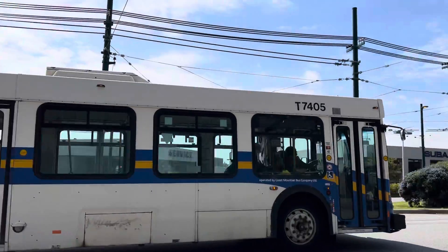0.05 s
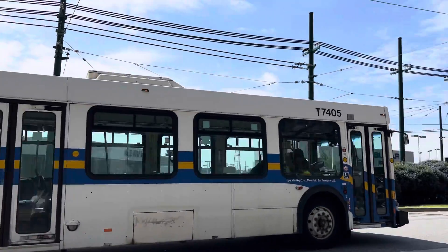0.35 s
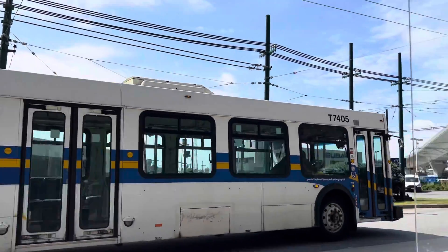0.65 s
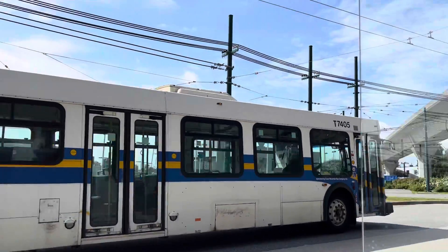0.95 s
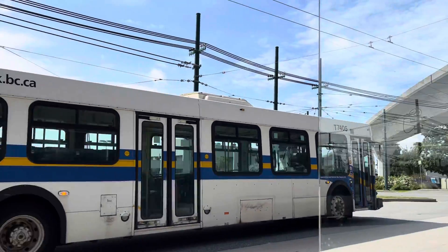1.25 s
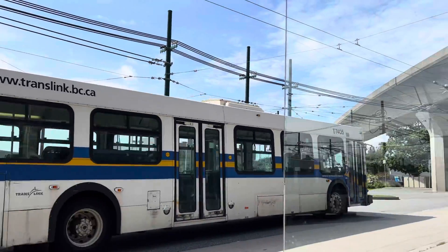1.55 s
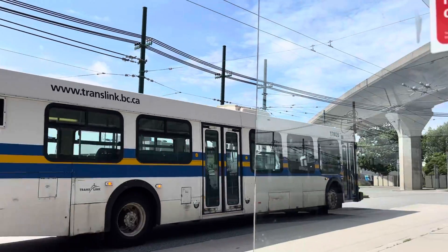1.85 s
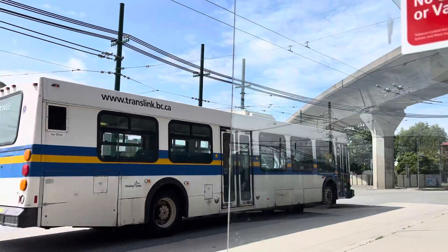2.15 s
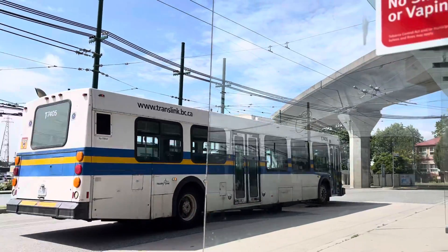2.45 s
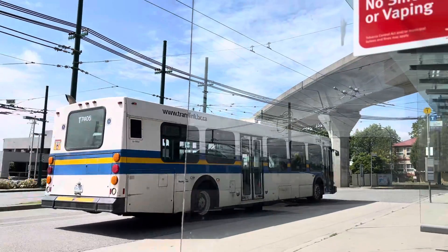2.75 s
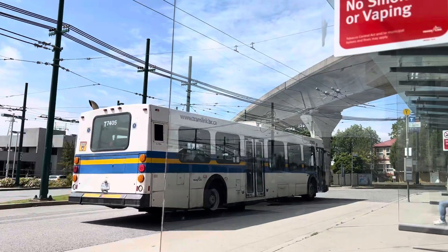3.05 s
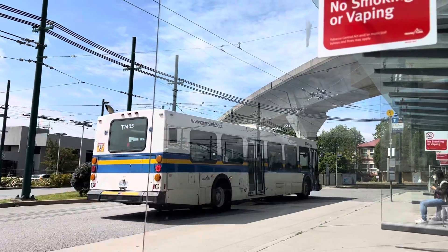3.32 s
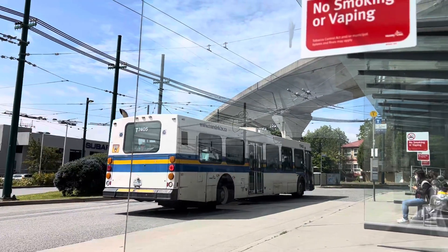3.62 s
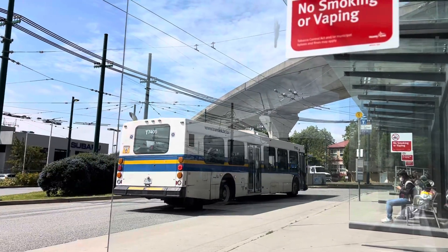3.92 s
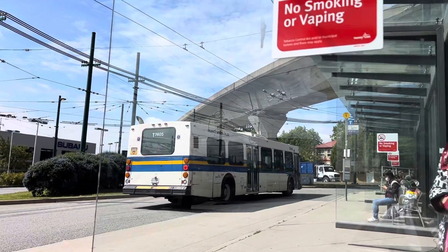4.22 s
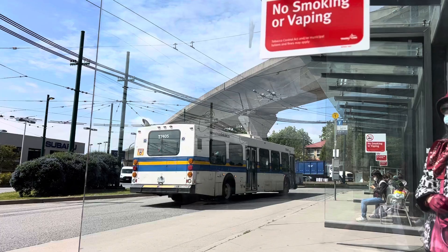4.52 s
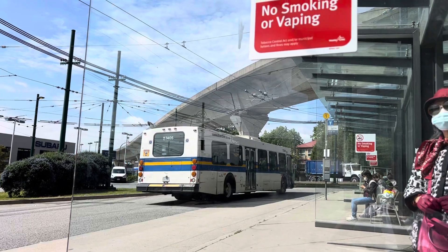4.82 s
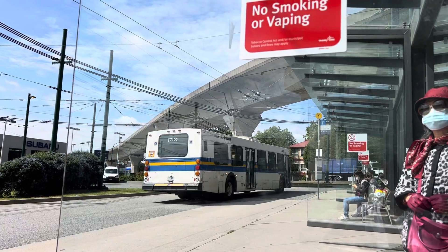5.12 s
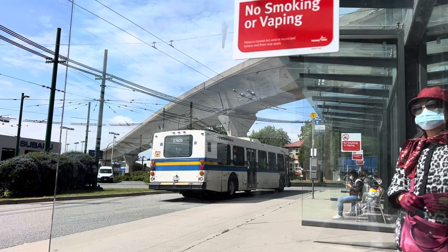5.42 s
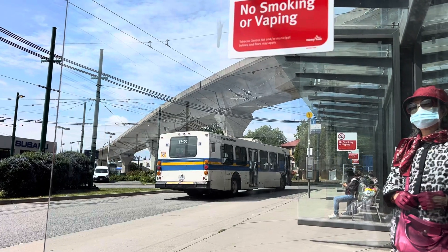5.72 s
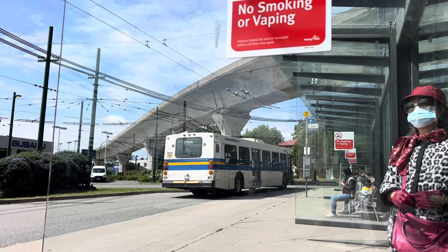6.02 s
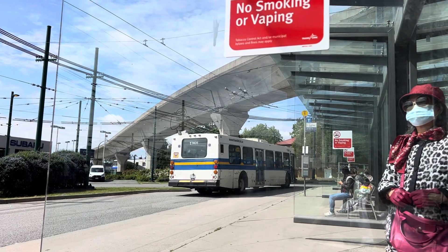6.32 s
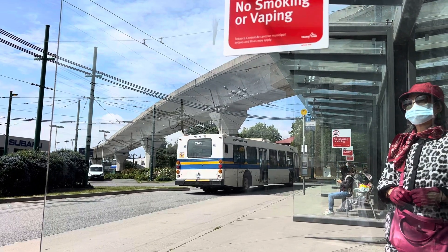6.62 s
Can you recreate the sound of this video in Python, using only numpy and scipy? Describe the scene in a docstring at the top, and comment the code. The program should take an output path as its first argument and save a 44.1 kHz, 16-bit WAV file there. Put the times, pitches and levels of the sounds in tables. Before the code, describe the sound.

A diesel bus throbs past close by with rattles and two sharp air pops, then pulls away and lets out a short hiss.

```python
"""A diesel bus rolls past a roadside stop at low revs, over street rumble. Its exhaust throbs,
injectors clatter, gears sing, the fan roars and the turbo spins down. From 0.4 s a loose cover
rattles; air valves pop and hiss near 0.6 s and 1.5 s. The bus pulls away, with a thin whine from 4 s.
Other traffic nears, and at 6 s the bus blows a short hiss of air, echoed by shelter and viaduct."""
import sys
import numpy as np
from scipy import signal
from scipy.fft import irfft, next_fast_len
from scipy.io import wavfile

SR = 44100
rng = np.random.default_rng(int(sys.argv[2]) if len(sys.argv) > 2 else 0)


def persist_wave(psi):
    """Save psi, clipped to +-1, as 16-bit WAV."""
    counts = np.round(np.clip(psi, -1, 1) * 32767).astype(np.int16)
    wavfile.write(sys.argv[1], SR, np.atleast_2d(counts).T)


N = 298106
TIME = np.arange(N) / SR
FFT_SIZE = next_fast_len(N, real=True)
HZ = np.maximum(np.fft.rfftfreq(FFT_SIZE, 1 / SR), 1)

# stereo width of the noise: f/Hz, left-right correlation; a narrow band at 9-11 kHz is in opposite phase
STEREO_CORRELATION = [(70, .99), (150, 0.4), (350, 0.75), (700, 0), (2000, 0.08), (6000, 0.1), (7500, .9),
                      (8500, .7), (9100, -.9995), (10900, -.9995), (11600, .93)]
STEREO_BALANCE = [(80, 0.5), (350, 2), (900, 1), (2400, 5.5), (4500, 9), (8500, 1), (15000, -2.5)]  # balance of the noise: f/Hz, left-right/dB

FIRING_RATE = [(0, 47.2), (.21, 46.2), (.38, 41.6), (.53, 39.5), (.63, 40.9), (.76, 41.9), (1.0, 46.6),
               (1.17, 47), (1.3, 44.8), (1.4, 38.9), (1.49, 38.9), (1.72, 40.9), (2.31, 39.2), (2.39, 36.4),
               (2.55, 36.9), (3.75, 36.5), (4.15, 39.0), (4.6, 39.1), (5.3, 37.7), (6.76, 35.7)]  # engine speed: t/s, f/Hz
# throttle between gear changes: start/s, end/s, release/s, sag/(dB/s), base level/dB of orders 1-4
PULLS = [(-.05, .21, 0.19, 8, -14.5, -28.5, -23.5, -51), (0.45, 1.2, 0.17, 2.8, -16, -22, -28.5, -42.5),
         (1.385, 2.266, 0.1, 2.5, -19.5, -20.5, -26, -49), (2.334, 4.06, 1, -0.5, -23.5, -21.5, -24, -46),
         (4.534, 6.8, .2, -0.5, -27, -19.5, -24.5, -40)]
OVERRUN_DB = [-34, -38, -30.5, -40.5]  # throttle shut: base level/dB of orders 1-4
GEAR_SHIFTS = [(0.39, 0.055, -9), (1.35, 0.027, -9), (2.345, 0.025, 1)]  # exhaust catches: t/s, half-length/s, gain/dB
THROB = [(.6, -1), (.85, 1.5), (1.38, 1), (1.47, -3), (1.57, 2.5), (1.75, -2), (2.0, -1), (2.4, -2.5),
         (2.6, -2), (3.5, 1), (4.2, 2), (5.0, -3), (5.6, 2), (6.1, -2), (6.6, -9)]  # order 1 wavers: t/s, gain/dB
DRONE = [(.6, 0), (.96, -0.5), (1.04, -5), (1.14, 2.5), (2.3, 1.5), (2.65, -0.5), (3.05, 2), (3.5, -2),
         (3.7, 4), (4.0, -2.5), (4.15, 1.5), (4.38, -6.5), (4.8, 4), (5.1, 1.5), (5.33, -5.5), (5.47, 1),
         (6.3, 0.5), (6.6, 4)]  # order 2 wavers: t/s, gain/dB
PUFF_BLUR = [(1.0, 0.35), (1.7, 0.55), (2.6, 0.7)]  # puffs merge to a drone behind the bus: t/s, blur (0-1)
CRANK_TONES = [(7, -18), (8, -20), (10, -16.5), (13, -24), (15, -19.5), (16, -22), (18, -23), (20, -22.5),
               (21, -23), (23, -23.5), (24, -26.5), (27, -20.5), (33, -20), (37, -25.5)]  # unequal cylinders: multiple of crank rate, relative level/dB

BLOCK_MODES = [(1024, 4, 0.26), (1092, 5.5, 0.048), (1174.5, 4, 0.12), (1591, 2.5, 0.05), (1675, -3, 0.04),
               (2423, 2, 0.05), (2538, -0.5, 0.043), (3240, -4.5, 0.022), (3508, -2, 0.03),
               (3630, -5, 0.039), (4130, -3.5, 0.028)]  # block and covers: f/Hz, relative level/dB, t60/s
GRILLE = [(0, -10), (.7, -7.5), (1.1, -10), (1.5, -8), (2, -4.5), (3.2, -5.5), (4, -14.5), (6.76, -30)]  # knock let out as the grille turns: t/s, gain/dB
GEAR_TONES = [(14, -5.5), (23, -12)]  # timing gears: multiple of firing rate, level/dB re order 4

# roar, clatter, hiss: lead on exhaust/m, near level/dB, rev slope/(dB/oct), distance power, floor/dB
BAY_LAYERS = [(3, -25, 2.5, 1.62, -35), (1.5, -29, 1.5, 1.61, -43), (-0.4, -37.5, 6, 2.35, -55)]
BAY_SPECTRUM = [(90, 10), (150, -0.5), (195, 1.5), (240, -5.5), (340, -2.5), (560, -6.5), (950, -6.5),
                (1330, -12.5), (2300, -15), (4300, -24.5), (6300, -34.5), (7400, -39), (10500, -46.5),
                (15500, -54.5)]  # engine bay: f/Hz, relative density/dB
BAY_RESONANCES = [(291, 30, 2.5), (348, 22, 3), (453, 35, 2), (1125, 96, 2.5), (1496, 80, 3.5),
                  (2490, 60, 0), (3230, 76, 0), (6470, 180, 7)]  # cavity: f/Hz, width/Hz, gain/dB
BAY_BEARING = [(0, 0.39, 0.5), (1.3, 0.37, -4), (2, 0.15, 1), (3.1, 0.18, 1.5), (3.8, 0.11, -2),
               (6.76, 0.054, -3)]  # direction: t/s, right-ear lag/ms, left-right/dB before band weighting
TURBO = [(0, 4220, -59), (.17, 4030, -57), (.265, 3920, -53), (.3, 3865, -62), (.338, 3820, -44),
         (.368, 3780, -56), (.397, 3750, -44.5), (.435, 3690, -62), (.47, 3645, -55), (.55, 3585, -57),
         (.67, 3515, -58), (.8, 3420, -61), (1.2, 3250, -65), (2.15, 2920, -62), (2.33, 2820, -54),
         (2.55, 2720, -58), (2.85, 2640, -60), (3.1, 2600, -79)]  # whistle: t/s, f/Hz, level/dB
STREET_SPECTRUM = [(18, -26), (30, 0), (45, 11.5), (75, 12.5), (110, -3), (160, -21), (350, -8),
                   (1000, -15.5), (4000, -74)]  # rumble: f/Hz, relative density/dB

RATTLES = [(0.41, -25, -20), (0.947, -32, 0), (1.10, -29, -2), (1.222, -33, -4), (1.366, -33, -8),
           (1.668, -30, -1), (1.812, -40, 14.5), (1.948, -40.5, 11.5), (1.992, -31, -5), (2.222, -33, 0),
           (2.397, -33, 3), (2.508, -29, -1), (2.588, -31, 1), (2.75, -37, 4), (2.815, -36, 0),
           (2.928, -37, 7), (3.086, -32, -4), (3.164, -40, 0), (3.243, -45, 10.5), (3.28, -36, -2),
           (3.41, -33.5, -8), (3.486, -33, -9)]  # cover knocks: t/s, level/dB, tilt/(dB/oct)
COVER_MODES = [(1014, -3, 0.095), (1056, -8.5, 0.079), (1180, -9, 0.075), (1596, -5.5, .06),
               (2450, -12, 0.06), (2586, -10, 0.059), (3544, -18.5, .04)]  # loose cover: f/Hz, gain/dB, t60/s

# air valves: t/s, snap/dB, crack/dB, crack delay/s, hold/s, fall/s,
# thud/dB, thud f/Hz, thud rise/s, thump/dB, squeak/dB
POPS = [(0.5712, -23, -21.5, 0.0025, 0.0065, 0.014, -14, 451, 0.0064, -15.5, -29.5),
        (1.552, -21.5, -20.5, 0.0024, 0.0026, 0.015, -16, 464, 0.006, -12.5, -39)]
CRACK_SPECTRUM = [(150, 9), (320, 16.5), (600, -1), (1150, 9), (1500, -4), (2800, -0.5), (3600, -5),
                  (6000, -12.5), (8500, -9), (12000, -14), (15500, -19)]  # air blast: f/Hz, relative density/dB
VALVE_MODES = [(303, -9, 0.0042), (373, -17, 0.0045), (746, -16, 0.0047), (1140, -29, .007),
               (2190, -25.5, 0.021), (2702, -16.5, 0.0057)]  # valve body: f/Hz, level/dB re thud, rise/s
BRACKET_MODES = [(215, -9, 0.0031), (333, -2.5, 0.0012)]  # shaken by the piston: f/Hz, level/dB re thump, rise/s
SEAT_MODES = [(5650, -1.5), (5780, -4), (6100, -3), (7000, -19)]  # valve seat: f/Hz, level/dB re squeak
JETS = [(0.656, -31, .002, 0.023, 0.021, 9100, -18), (0.658, -30.5, 0.011, 0.013, 0.017, 5000, 33),
        (0.805, -50.5, 0.055, 0.11, 0.036, 10500, 0), (1.46, -43, .003, .006, .01, 5000, 11),
        (3.855, -56, .13, .08, 0.18, 6200, 10.5), (6.057, -28, 0.041, 0.023, 0.11, 2500, 7)]  # air releases: t/s, level/dB, rise/s, hold/s, fall/s, low edge/Hz, nozzle peak/dB
AIR_SPECTRUM = [(700, 12), (2700, 13.5), (4400, 12.5), (6000, 4.5), (8300, 10.5), (10500, 14), (11400, 3),
                (12200, 5.5), (15300, 2)]  # escaping air: f/Hz, relative density/dB

WHINE = [(4.0, 3500, -80), (4.25, 3500, -67), (4.55, 3485, -62), (5.0, 3470, -62), (5.3, 3440, -64.5),
         (5.7, 3430, -66.5), (6.76, 3410, -74)]  # receding bus: t/s, f/Hz, level/dB
TRAFFIC_LEVEL = [(4.5, -45), (5.6, -42), (6.05, -35.5), (6.76, -41.5)]  # across the road: t/s, level/dB
TRAFFIC_SPECTRUM = [(25, -45), (70, -11), (160, 3), (240, -0.5), (350, 1), (600, -9.5), (1400, -10.5),
                    (4000, -39), (10000, -63.5)]  # its noise: f/Hz, relative density/dB
TRAFFIC_HUM = [(146.6, 13, 13), (200, 16, 5.5), (351, 25, 7)]  # its engines: f/Hz, width/Hz, gain/dB


def from_db(db):
    """Decibels to gain."""
    return np.exp(np.asarray(db) * (np.log(10) / 20))


def unit_rms(x):
    """Scale to unit power."""
    return x / np.sqrt(np.mean(x ** 2) + 1e-20)


def over_time(rows):
    """Each column after t/s, interpolated per sample."""
    times_s, *columns = np.transpose(rows)
    return [np.interp(TIME, times_s, column) for column in columns]


def over_hz(rows):
    """Table interpolated over log frequency."""
    hz, value = np.transpose(rows)
    return np.interp(np.log(HZ), np.log(hz), value)


def bell(centre_hz, width_hz, hz=HZ):
    """Resonance curve of height 1."""
    return 1 / (1 + (2 * (hz - centre_hz) / width_hz) ** 2)


def above(edge_hz, order):
    """High-pass power response."""
    return 1 / (1 + (edge_hz / HZ) ** (2 * order))


def drift(rate_hz):
    """Slow random curve, unit RMS."""
    steps = rng.standard_normal(4096)
    return unit_rms(np.interp(TIME * rate_hz, np.arange(len(steps)), steps))


def pan(left_db):
    """Left and right gains, unit mean power."""
    gains = from_db(np.array([left_db / 2, -left_db / 2]).reshape(2, -1))
    return gains / np.sqrt(np.mean(gains ** 2, axis=0))


def white_spectra(count):
    """Spectra of independent white noises."""
    return rng.standard_normal((count, 2 * len(HZ))).view(complex)


def point_noise(gain):
    """Coloured mono noise, unit RMS."""
    return unit_rms(irfft(white_spectra(1)[0] * gain, FFT_SIZE)[:N])


def stereo_noise(gain):
    """Coloured noise, unit RMS; width and balance vary with frequency."""
    mid, side = white_spectra(2)
    correlation = np.clip(over_hz(STEREO_CORRELATION), -1, 0.995)
    pair = np.sqrt(1 + correlation) * mid + np.sqrt(1 - correlation) * side * [[1], [-1]]
    return unit_rms(irfft(pair * gain * pan(over_hz(STEREO_BALANCE)), FFT_SIZE)[:, :N])


def struck(kicks, hz, t60_s):
    """One mode, ringing after each kick."""
    radius, angle = from_db(-60 / (t60_s * SR)), 2 * np.pi * hz / SR
    return signal.lfilter([0, np.sin(angle)], [1, -2 * radius * np.cos(angle), radius ** 2], kicks)


def distance_db(ahead_m=0, closest_s=1.55, closest_m=6.0, speed_m_per_s=4.0):
    """Spreading re the closest point of a straight, steady pass."""
    along_m = speed_m_per_s * (TIME - closest_s) + ahead_m
    return -20 * np.log10(np.hypot(along_m, closest_m) / closest_m)


def exhaust_levels_db(firing_hz, attack_s=0.14, swell_db=4.5, crest_s=5.33, period_s=2.02):
    """Orders 1-4 follow the throttle and fade with distance."""
    gain = from_db(OVERRUN_DB)[:, None]
    for start_s, end_s, release_s, sag_db_per_s, *pull_db in PULLS:
        opening = np.clip((TIME - start_s) / attack_s, 0, 1)
        closing = np.clip(1 - (TIME - end_s) / release_s, 0, 1)
        pulling = from_db(np.array(pull_db)[:, None] - sag_db_per_s * (TIME - start_s))
        gain = gain + opening * closing * (pulling - gain)
    catch_db = sum(db * np.exp(-((TIME - at_s) / half_s) ** 2) for at_s, half_s, db in GEAR_SHIFTS)
    far_db = distance_db()
    base_db = 20 * np.log10(gain) + catch_db + far_db
    reflected_share = 1 - from_db(far_db) ** 2
    reflection_db = reflected_share * swell_db * np.cos(2 * np.pi * (TIME - crest_s) / period_s)
    pipe_boom_db = 15.5 * bell(centre_hz=190.8, width_hz=21.4, hz=4 * firing_hz)
    return base_db + [over_time(THROB)[0], over_time(DRONE)[0], reflection_db, pipe_boom_db]


def exhaust(firing_rad, orders_db, roar_db, waver=0.06, rough=0.34, wall_db=-20):
    """Four low orders throb; unequal cylinders add weak, wavering crank harmonics."""
    blur_rad = over_time(PUFF_BLUR)[0] * np.pi / 2
    throb = -sum(from_db(db) * (1 + waver * drift(23)) * np.cos(k * firing_rad + blur_rad * (k - 2) ** 2)
                 for k, db in enumerate(orders_db, 1))
    crank_rad = firing_rad / 3  # three firings per turn
    overtones = 0
    for k, db in CRANK_TONES:
        gain = from_db(roar_db + db) * (1 + rough * drift(14))
        overtones -= gain * np.cos(k * crank_rad + rough * drift(9))
    # the shelter wall returns higher orders differently to each ear
    wall = sum(from_db(db + wall_db) * (k - 1) * np.sin(k * firing_rad + k * k + drift(1.56))
               for k, db in enumerate(orders_db, 1))
    return np.sqrt(2) * from_db(-0.3) * ((throb + overtones) * pan(-0.86) + wall * [[1], [-1]])


def diesel_knock(firing_rad, clatter_db, uneven_db=4, valve_db=-6, rattle_s=0.0031, echo_db=-4):
    """Each firing and two valve closings in between strike the block unevenly."""
    hits = np.flatnonzero(np.diff(np.floor(3 * firing_rad / (2 * np.pi))))
    accent_db = np.where(np.arange(len(hits)) % 3, valve_db, 0)
    out = 0
    for hz, db, t60_s in BLOCK_MODES:
        blows = np.zeros(N)
        blows[hits] = from_db(accent_db + uneven_db * np.clip(rng.standard_normal(len(hits)), -2, 2))
        envelope = signal.lfilter([1], [1, -np.exp(-1 / (rattle_s * SR))], blows)
        grit = from_db(echo_db) * rng.standard_normal(N) + rng.standard_normal((2, N))
        mode = unit_rms(struck(envelope * grit, hz, t60_s))
        out += from_db(db) * mode * pan(6 + 2 * np.log2(hz / 1050))
    return unit_rms(out) * from_db(clatter_db + over_time(GRILLE)[0])


def gears(firing_rad, load_db, jitter_rad=0.6, waver=0.3):
    """Gear teeth sing under load."""
    out = 0
    for k, db in GEAR_TONES:
        gain = from_db(load_db + db) * (1 + waver * drift(25))
        out += gain * np.cos(k * firing_rad + jitter_rad * np.array([drift(18), drift(22)]))
    return out


def bay_levels_db(firing_hz, cruise_hz=40):
    """Roar, clatter and hiss follow the revs and fade to what the street returns."""
    octaves = np.log2(firing_hz / cruise_hz)
    levels_db = []
    for ahead_m, near_db, db_per_oct, power, floor_db in BAY_LAYERS:
        direct = from_db(near_db + db_per_oct * octaves + power * distance_db(ahead_m))
        levels_db.append(20 * np.log10(np.hypot(direct, from_db(floor_db))))
    return levels_db


def engine_bay(firing_rad, levels_db, direct_share=0.27, pulse_depth=0.056, flutter_db=0.84):
    """Fan roar, injector clatter, intake hiss; the upper two bands pulse with each firing."""
    cavity_db = sum(db * bell(hz, width_hz) for hz, width_hz, db in BAY_RESONANCES)
    colour = from_db(over_hz(BAY_SPECTRUM) + cavity_db) * np.sqrt(above(114, order=3))
    past_roar, past_clatter = above(750, order=3), above(4500, order=3)
    shares = [1 - past_roar, past_roar * (1 - past_clatter), past_clatter]
    lag_ms, left_db = over_time(BAY_BEARING)
    out = 0
    for band, (share, db) in enumerate(zip(shares, levels_db)):
        gain = colour * np.sqrt(share)
        left = point_noise(gain * np.sqrt(1 - above(3000, order=4)))
        right = np.interp(TIME - lag_ms / 1000, TIME, left)
        direct = np.array([left, right]) * pan(1.1 + band)
        sound = np.sqrt(direct_share) * direct + np.sqrt(1 - direct_share) * stereo_noise(gain)
        far_ear_shade = pan(left_db * band ** 2 / 5)
        pulsing = 1 + pulse_depth * min(band, 1) * np.cos(firing_rad)
        out += sound * far_ear_shade * pulsing * from_db(db + flutter_db * drift(45))
    return out


def rotor_whistle(track, wobble, flutter_db):
    """Thin, wavering tone of a fast rotor."""
    hz, db = over_time(track)
    phase_rad = 2 * np.pi * np.cumsum(hz * (1 + wobble * drift(90))) / SR
    return np.sqrt(2) * from_db(db + flutter_db * drift(33)) * np.sin(phase_rad) * pan(6.2)


def street_rumble(level_db=-35.5, edge_hz=32):
    """Steady low noise from all around."""
    colour = from_db(over_hz(STREET_SPECTRUM)) * np.sqrt(above(edge_hz, order=6))
    return from_db(level_db) * stereo_noise(colour)


def cover_rattles(touches=3, bounce_s=0.008, loss_db=7):
    """The loose cover knocks and bounces; each touch strikes every mode unevenly."""
    start_s, db, db_per_oct = np.transpose(RATTLES)[:, :, None]
    touch = np.arange(touches)
    touch_s = start_s + bounce_s * touch * rng.uniform(0.8, 1.1, (len(start_s), touches))
    hits = (touch_s * SR).astype(int)
    out = 0
    for hz, mode_db, t60_s in COVER_MODES:
        tilt_db = db_per_oct * np.log2(hz / COVER_MODES[0][0])
        kicks = np.zeros(N)
        kicks[hits] = from_db(db + mode_db + tilt_db - loss_db * touch + rng.standard_normal(hits.shape))
        out += struck(kicks + 1e-18, hz, t60_s)
    return out * pan(6.5)


def burst(start_s, rise_s, hold_s, fall_s):
    """Envelope: a valve opens, holds, and the pressure runs out."""
    age_s = TIME - start_s
    return np.clip(age_s / rise_s, 0, 1) * np.exp(-np.clip((age_s - rise_s - hold_s) / fall_s, 0, 40))


def ring(start_s, hz, rise_s):
    """A mode driven by a short blast swells, then dies."""
    live = (TIME > start_s) & (TIME < start_s + 20 * rise_s)
    age_s, out = TIME[live] - start_s, np.zeros(N)
    out[live] = age_s / rise_s * np.exp(1 - age_s / rise_s) * np.sin(2 * np.pi * hz * age_s)
    return out


def valve_pops(thud_delay_s=0.00282, stop_delay_s=0.00553, tail_db=-19, tail_s=0.083):
    """The seat snaps and squeaks, air cracks, valve and pipe ring, the piston thumps its stop."""
    crack = stereo_noise(from_db(over_hz(CRACK_SPECTRUM)) * np.sqrt(above(150, order=2)))
    snap = stereo_noise(np.sqrt(above(8000, order=2) * (1 - above(11600, order=8))))
    out = 0
    for (at_s, snap_db, crack_db, delay_s, hold_s, fall_s,
         thud_db, thud_hz, thud_rise_s, thump_db, squeak_db) in POPS:
        blast = burst(at_s + delay_s, 0.00071, hold_s, fall_s)
        tail = from_db(tail_db) * burst(at_s, 0.01, hold_s, tail_s)
        thud = ring(at_s + thud_delay_s, thud_hz, thud_rise_s)
        body = sum(from_db(db) * ring(at_s, hz, rise_s) for hz, db, rise_s in VALVE_MODES)
        thump = -sum(from_db(db) * ring(at_s + stop_delay_s, hz, rise_s)
                     for hz, db, rise_s in BRACKET_MODES)
        squeak = sum(from_db(db) * ring(at_s, hz, rise_s=0.0063) for hz, db in SEAT_MODES)
        out += from_db(snap_db) * burst(at_s, 0.00041, hold_s=0.002, fall_s=0.002) * snap
        out += from_db(crack_db) * (blast + tail) * crack
        out += (from_db(thud_db) * (thud + body) + from_db(squeak_db) * squeak) * pan(6.7)
        out += from_db(thump_db) * thump * pan(2.5)
    return out


def air_jets(nozzle_hz=5890, nozzle_width_hz=2700, echo_db=-10.5, echo_s=0.24):
    """Escaping air hisses; longer jets fill the street with more echo."""
    out = 0
    for at_s, db, rise_s, hold_s, fall_s, edge_hz, nozzle_db in JETS:
        colour = from_db(over_hz(AIR_SPECTRUM) + nozzle_db * bell(nozzle_hz, nozzle_width_hz))
        hiss = stereo_noise(colour * np.sqrt(above(edge_hz, order=2)))
        echo_gain = from_db(echo_db) * np.sqrt((hold_s + fall_s) / echo_s)
        echo = echo_gain * burst(at_s, 0.07, hold_s, min(echo_s, 4 * fall_s))
        out += from_db(db) * np.hypot(burst(at_s, rise_s, hold_s, fall_s), echo) * hiss
    return out


def traffic():
    """Noise and engine hum swell as traffic nears."""
    hum_db = sum(db * bell(hz, width_hz) for hz, width_hz, db in TRAFFIC_HUM)
    colour = from_db(over_hz(TRAFFIC_SPECTRUM) + hum_db)
    return from_db(over_time(TRAFFIC_LEVEL)[0]) * stereo_noise(colour)


def scene():
    """Revs, throttle and distance drive the engine; the other sources add to it."""
    firing_hz = over_time(FIRING_RATE)[0]
    firing_rad = 2 * np.pi * np.cumsum(firing_hz) / SR
    orders_db, bay_db = exhaust_levels_db(firing_hz), bay_levels_db(firing_hz)
    engine = exhaust(firing_rad, orders_db, roar_db=bay_db[0])
    engine += diesel_knock(firing_rad, clatter_db=bay_db[1])
    engine += gears(firing_rad, load_db=orders_db[-1])
    engine += from_db(-3) * engine_bay(firing_rad, bay_db)
    turbo = rotor_whistle(TURBO, wobble=0.003, flutter_db=2.5)
    whine = rotor_whistle(WHINE, wobble=0.014, flutter_db=2.0)
    background = street_rumble() + traffic()
    return engine + turbo + background + cover_rattles() + valve_pops() + air_jets() + whine


def record(dry):
    """Steep low-pass at 15.9 kHz."""
    return signal.sosfilt(signal.ellip(10, 0.1, 90, 15900, fs=SR, output="sos"), dry)


dry = scene()
out = record(dry)
persist_wave(out)
```